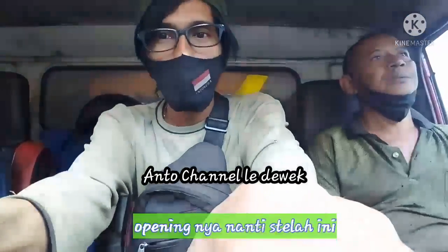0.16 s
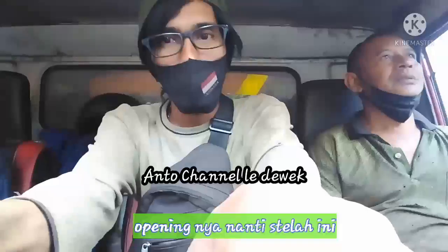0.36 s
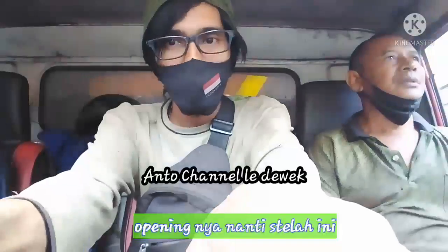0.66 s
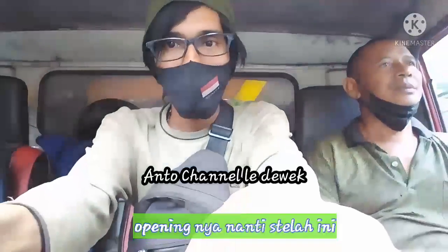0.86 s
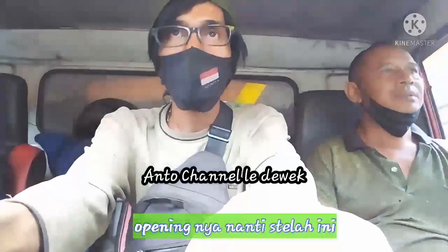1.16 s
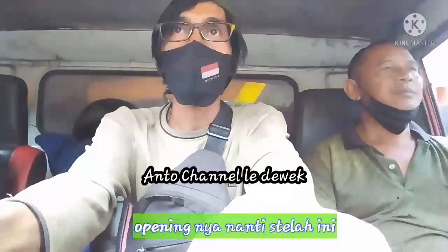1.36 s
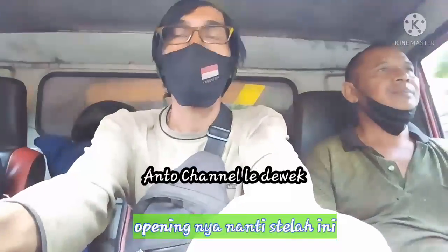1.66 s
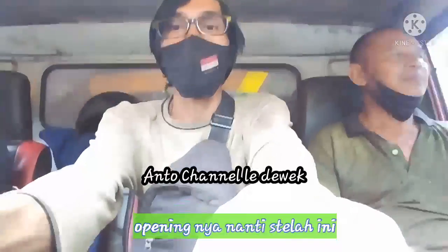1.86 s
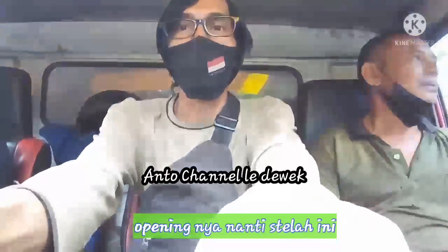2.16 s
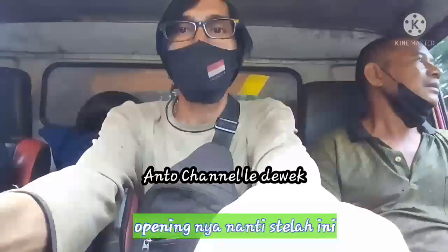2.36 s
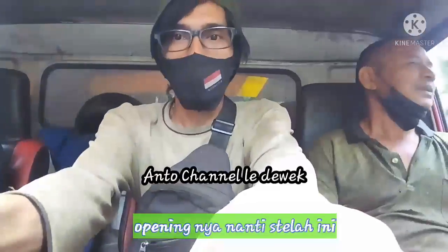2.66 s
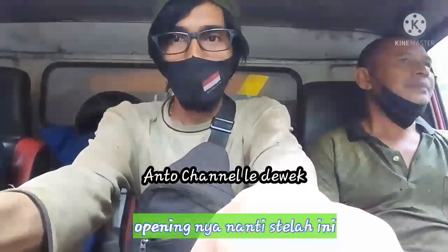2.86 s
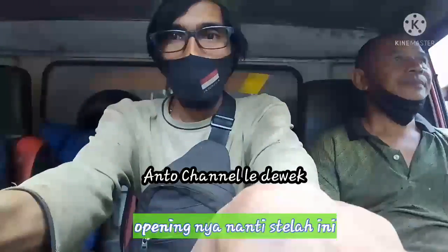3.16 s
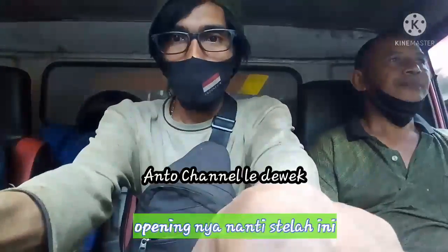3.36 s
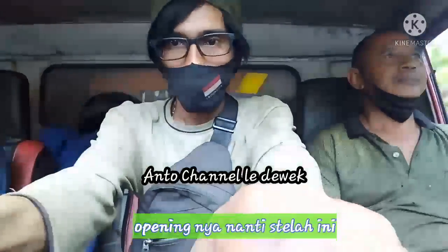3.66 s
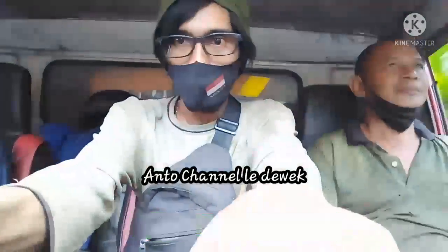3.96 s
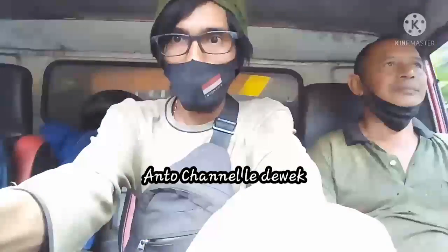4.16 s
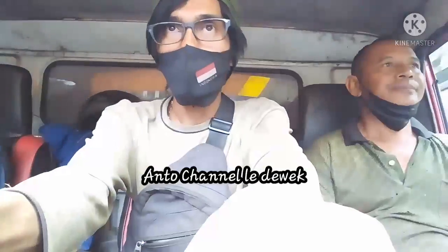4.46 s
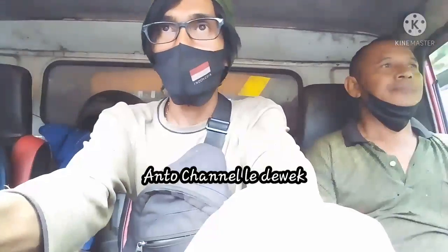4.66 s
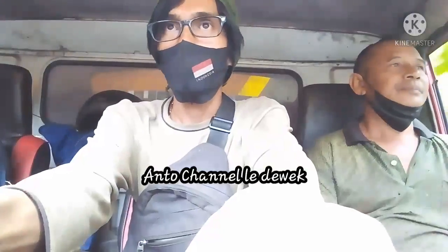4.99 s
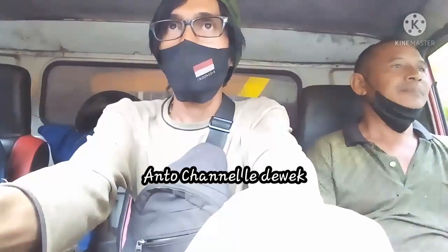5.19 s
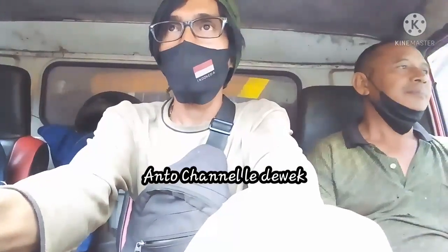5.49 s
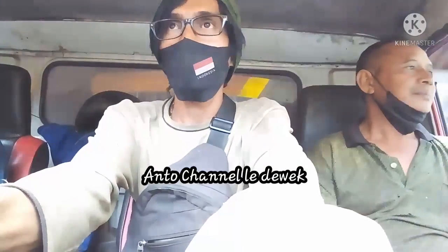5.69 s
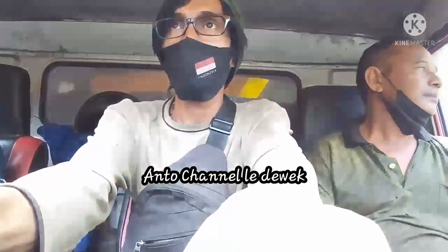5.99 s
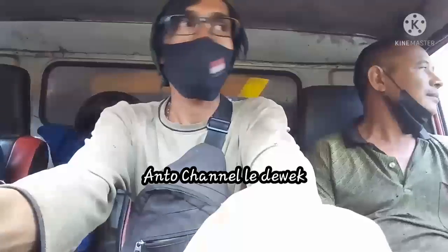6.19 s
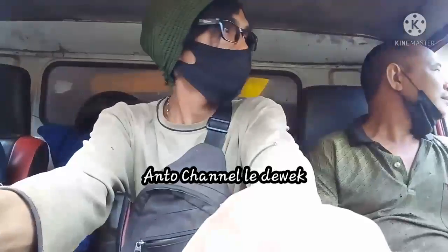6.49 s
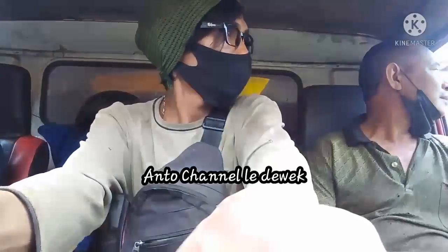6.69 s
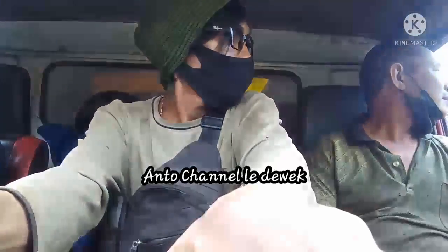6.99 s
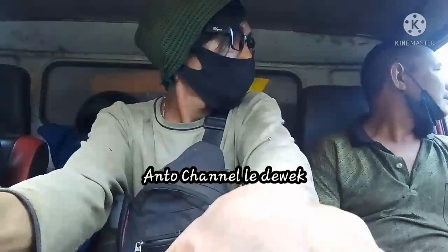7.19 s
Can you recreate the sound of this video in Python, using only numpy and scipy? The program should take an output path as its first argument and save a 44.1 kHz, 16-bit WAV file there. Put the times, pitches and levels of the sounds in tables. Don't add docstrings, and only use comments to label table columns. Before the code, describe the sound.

Inside a truck cab, a diesel engine drones low while wind pops thump the microphone, then a sudden jump to a louder, harder drone.

```python
import sys
import numpy as np
from scipy import signal
from scipy.fft import rfft, irfft, next_fast_len
from scipy.io import wavfile
from scipy.ndimage import uniform_filter1d, minimum_filter1d

SR = 44100
rng = np.random.default_rng(int(sys.argv[2]) if len(sys.argv) > 2 else 0)


def pcm_store(signal):
    levels = np.round(np.clip(np.atleast_2d(signal), -1, 1) * 32767)
    wavfile.write(sys.argv[1], SR, levels.astype(np.int16).T)


def magnitude_from_level(level_db):
    exponent = np.asarray(level_db, float) / 20
    return 10 ** exponent


N = 323546

# time in seconds, firing rate in Hz, drone lines above their usual share in dB.
FIRING = [(0, 52.3, 3.5), (.35, 51.91, 0), (.75, 50.82, 1.5), (1.15, 49.07, 1), (2.1, 48.6, 0),
          (2.9, 50.47, -7.5), (3.6, 51.63, -8.5), (4.3, 53.2, -7.5), (4.9, 54.25, -10), (5.1, 55.36, 1.5),
          (5.5, 55.2, 2), (5.9, 55.75, -0.5), (6.1, 56.5, 0), (6.3, 55.68, -1), (6.75, 55.84, 0.5),
          (6.95, 53.98, -1), (7.15, 52.75, -1), (7.34, 54.5, 2)]
# time in seconds, level in dB, load from 0 to 1.
LOAD = [(0, -24.5, 0.4), (.28, -24.5, 0.19), (1.1, -27.5, 0.16), (1.3, -33.5, 0.32), (1.73, -32.5, 0.26),
        (2.1, -31, 0.22), (2.61, -28.5, 0.19), (3.02, -32, 0.3), (3.35, -31.5, 0.37), (3.7, -36.5, 0.3),
        (4.2, -40, 0.22), (4.9, -34.5, 0.03), (5.01, -19.5, 0.52), (5.4, -26, 0.91), (5.9, -23.5, 0.79),
        (6.15, -21.5, 0.81), (6.72, -18.5, 0.76), (7.34, -19, 0.59)]
# multiple of the firing rate, level at full load in dB, loss at light load in dB.
DRONE_ORDERS = [(1.5, -20, 6), (6, -23.5, 5.5), (2.5, -16.5, 10), (2, -2.5, 1.5), (3, -9.5, 5.5),
                (3.5, -13, 7.5), (4, -13.5, -4), (5, -8, 11.5), (5.5, -19, 6)]
WHINE_ORDERS = [(4.5, -20.5, 6), (9, -16, 18), (10, -17.5, 14), (11, -19.5, 13), (14, -19, 19),
                (7, -24, 14), (8, -27, 14)]
# centre in seconds, depth in dB, half length in
# seconds.
HOLLOWS = [(0.43, 3, 0.12), (0.916, 8, 0.063), (1.263, 11, 0.066), (1.535, 9, 0.071), (1.912, 23, 0.053),
           (2.23, 12, 0.089), (2.969, 2.5, 0.052), (3.1, 1, 0.088), (3.467, 4.5, 0.056), (4.207, 11, 0.13),
           (4.4, 14, 0.11), (4.594, 21, 0.099), (4.756, 7, 0.069), (4.973, 11, .06), (5.69, 5, 0.089),
           (6.09, 3.5, 0.3), (6.76, 3, 0.15), (7.135, 3, 0.46), (7.34, 12, 0.02)]
# frequency in Hz, width in Hz, level at full load in dB, loss at light load in dB.
PANELS = [(499, 35, -8, 4), (540.3, 41, -8, 3), (610.5, 29, -11, 6.5), (772, 52, -9, 1.5),
          (1116, 59, -24, 10.5), (1605, 54, -27, 14), (1920, 90, -33, 2.5), (959, 11, -23, 4),
          (1333, 25, -23.5, 4), (1430, 61, -23, 13.5)]
# time in seconds, level in
# dB.
WINDOW = [(0, -56), (1.1, -56.5), (1.49, -59.5), (1.9, -57), (2.29, -54), (2.61, -51), (2.9, -54),
          (3.6, -56.5), (4.2, -61), (4.72, -60), (4.95, -65), (5.06, -32), (5.31, -45), (5.66, -39),
          (6.0, -44.5), (6.13, -35.5), (6.5, -41.5), (7.34, -45.5)]

# frequency in Hz, density in dB per Hz.
RUMBLE_COLOUR = [(25, -15.5), (60, -17), (95, -10), (130, -1), (200, -3.5), (280, -13), (350, -19.5),
                 (500, -26)]
LUMPS_COLOUR = [(18, -20.5), (42, -17), (66, 2), (85, -7.5), (120, -23)]
ROAR_COLOUR = [(200, -24.5), (330, -3.5), (440, -6), (520, -0.5), (610, -3.5), (690, -8.5), (780, -6),
               (910, -13), (1350, -17), (1700, -25), (2400, -37.5)]
ROAD_COLOUR = [(600, -15), (1000, 0), (1400, 2), (1700, -2), (2600, -7.5), (2850, -9.5), (3050, -15),
               (4000, -23), (5000, -40.5)]
TICKOVER_COLOUR = [(700, -13.5), (1100, -2.5), (1500, -7), (1720, -8.5), (1980, -5.5), (2650, -6.5),
                   (2850, -11), (3050, -20), (3600, -26.5), (3750, -21), (4100, -27.5), (4300, -38.5)]
AIR_COLOUR = [(2600, -10), (3400, 0), (3900, 2.5), (4400, -1.5), (5700, -1.5), (6300, -16), (7800, -9),
              (11000, -11), (15500, -17.5)]
BUFFET_COLOUR = [(40, -23.5), (90, 5.5), (200, -3), (350, -13), (600, -23.5)]
WASH_COLOUR = [(250, -16), (420, -4), (560, 1), (800, -3), (1300, -9.5), (1900, -22), (3000, -48.5)]
RUSH_COLOUR = [(1000, -2.5), (1500, 1), (2650, -6), (3900, -17.5), (5000, -33.5), (7000, -58.5)]
HISS_COLOUR = [(3000, -24), (4300, 1.5), (5500, -1.5), (7000, -6), (11000, -8.5), (12500, -18.5),
               (15500, -19)]
PIPE_COLOUR = [(140, -28), (170, -6), (200, 0.5), (230, -5), (270, -30)]

# time in seconds, peak in dB, width in ms, rebound in Hz, damping from 0 to 1.
PUSHES = [(1, -11, 0.24, 74.2, 0.3), (1.1444, 2, 0.22, 93.5, 0.5), (1.1613, -11, 0.27, 130, 0.6),
          (1.1649, -6, 0.35, 125, 0.5), (1.1662, -7, 0.23, 125, .6), (1.1676, -5, 0.2, 125, 0.5),
          (1.174, -5.5, 0.26, 110, 0), (1.181, -8, 0.38, 142, 0.05), (1.6478, -8.5, 0.64, 59.9, 0.05),
          (1.689, 1, 0.7, 89.7, 1), (1.7096, -6, 0.47, 75, 0), (1.7283, -2.5, 0.99, 59, 1),
          (1.7334, -19.5, 0.27, 136, 0.3), (1.7778, -9, 0.38, 123, 0.17), (2.018, -14.5, 0.37, 166.5, 0.13),
          (2.0655, -1, 0.31, 137, 0.21), (2.107, -8.5, 0.49, 144, 0.22), (2.127, -11, 0.4, 95, 1),
          (2.143, -19.5, 0.44, 100, 0.49), (2.3278, -4, 0.67, 60, 0.3), (2.348, -10, 0.94, 110, .3),
          (2.778, -14, 0.27, 59.2, 0.3), (3.1502, -10.5, 0.38, 59.6, 0.37), (3.5974, 4, .21, 119, 0.34),
          (3.6642, -15, 0.28, 90, 0.15), (2.3305, -16.5, .4, 140, 0.6), (5.0065, -1, 1.8, 60, .4),
          (5.0112, -9, .7, 70, .5)]
PULLS = [(1.156, -5, 0.57, 89, 0.7), (1.1687, -9.5, .3, 120, 0.7), (1.1699, -6.5, 0.35, 120, 0.5),
         (2.329, -16, .5, 130, 0.8), (2.332, -15, 0.64, 130, .5), (1.669, -4, 1.2, 59.7, 0.23),
         (1.8332, -2.5, .33, 101, 0.17), (2.2147, -2, 0.28, 98, 0.17), (2.5693, 3, .33, 94, 0.12),
         (2.987, 2, 0.25, 100, 0.22), (3.007, 9.5, 1.7, 132, 0.57), (3.036, -2, 0.5, 110, 0.2),
         (3.1032, 2.5, .28, 79.6, 0.7), (3.4704, -17, 1.1, 78, 0.35), (3.7365, -20.5, 0.27, 118, 0.6),
         (3.9492, -17, .23, 101.2, 0.1), (3.968, -13, 0.63, 114, 0.22), (4.005, -7.5, 0.31, 95, 0.3),
         (4.2133, -19, 0.22, 108, 0.09), (4.497, -27, 0.2, 134, 0.07), (4.9865, 3.5, 0.36, 114, 0.16)]
# crest in seconds, wash in dB, seconds to rise 20 dB, seconds to fall 20 dB,
# brightness in dB.
GUSTS = [(1.003, -38, 0.0032, 0.062, -8.5), (1.07, -37.5, 0.066, 0.014, -30.5),
         (1.167, -15.5, 0.018, 0.013, -29.5), (1.221, -32.5, 0.017, 0.05, -20),
         (1.247, -34, 0.091, 0.012, -26.5), (1.962, -31, 0.071, 0.044, -13.5),
         (2.016, -29.5, 0.012, 0.024, -35), (2.11, -32.5, 0.039, 0.05, -27.5),
         (2.224, -34, 0.0047, 0.033, -22), (2.329, -25.5, 0.015, 0.012, -21), (2.245, -49, .008, 0.13, -4),
         (2.41, -47, 0.12, 0.15, -7), (3.148, -39, 0.015, 0.048, -27.5), (3.289, -27.5, .14, 0.12, -13),
         (3.695, -28.5, 0.038, 0.033, -16.5), (4.036, -27, 0.018, 0.023, -17),
         (4.072, -35, 0.11, 0.0039, -13), (4.795, -53.5, 0.0116, 0.34, -7.5),
         (4.86, -43.5, 0.37, 0.092, -12), (5.011, -29.5, 0.0097, 0.71, -15),
         (5.074, -22.5, 0.055, 0.37, -10), (5.139, -22, 0.12, 0.1, -4), (5.189, -22, 0.24, 0.036, -6),
         (5.29, -40.5, 0.072, 0.013, -23)]
# start in seconds, level in dB, seconds to lose 20 dB.
BUFFETS = [(1.001, -16.5, 0.2), (1.158, -8.5, 0.12), (1.198, -17.5, 0.15), (1.94, -20, 0.07),
           (2.01, -22, -0.2), (2.085, -17.5, -0.17), (2.119, -7, 0), (2.227, -18, .04), (2.315, -17, 0),
           (2.39, -30.5, 3), (2.581, -21, 0.2), (3.11, -13, 0.05), (3.139, -16.5, 0.07), (3.189, -27, -0.5),
           (3.26, -23.5, 0.5), (3.41, -24, 0.2), (3.667, -20.5, -0.1), (4.01, -16, 0.08),
           (4.055, -25, -0.06), (4.289, -31, 0), (4.83, -29, 8), (4.926, -23, 0), (4.995, -15, 0.1),
           (5.07, -20, 0), (5.181, -21.5, -0.5), (6.04, -25, 1), (7.219, -15.5, -2)]
# start in seconds,
# end in seconds, level in dB, low edge in Hz, high edge in Hz. None lasts beyond 0.36 s
BRUSHES = [(1.03, 1.095, -79, 4300, 5800), (1.153, 1.188, -22, 290, 1200),
           (1.154, 1.183, -34.5, 1000, 2000), (1.153, 1.18, -62.5, 3100, 5400),
           (1.21, 1.252, -31, 370, 1130), (1.212, 1.25, -44.5, 1010, 2000), (1.215, 1.25, -75, 4600, 5400),
           (4.008, 4.052, -39, 260, 1130), (4.048, 4.082, -40, 320, 920), (4.012, 4.076, -63, 3000, 5900),
           (4.76, 4.5, -73, 4600, 5700), (5.43, 5.66, -57.5, 950, 4300), (6.06, 6.26, -37, 670, 870),
           (6.62, 6.82, -36, 560, 1640), (5.3, 6.44, -78, 7000, 11500), (2.22, 2.58, -87, 7000, 11500),
           (2.24, 2.3, -80, 4800, 6000), (2.237, 2.243, -64, 2500, 5500), (2.222, 2.238, -42.5, 400, 1740),
           (1.215, 1.25, -31, 250, 480), (5.1, 5.9, -74.5, 6200, 11000), (2.322, 2.342, -37, 210, 770),
           (5.2, 5.235, -40, 600, 2200), (5.27, 5.33, -46, 780, 2200), (2.5683, 2.5703, -48, 1800, 4000),
           (3.1022, 3.1042, -57, 2200, 5500), (3.5965, 3.5985, -53, 3000, 5300),
           (2.0645, 2.0665, -50, 2000, 3600), (3.668, 3.69, -46, 400, 1500), (1.163, 1.17, -22, 500, 1300)]
# crest in seconds, level in dB, seconds to rise 20 dB, seconds to fall 20 dB.
SWELLS = [(2.12, -26.5, .03, .06), (2.335, -25.5, .02, .06), (3.16, -25, 0.044, .08), (3.29, -27, .12, .12),
          (6.121, -26, .15, 0.16), (6.6, -28.5, 0.25, 0.16), (6.85, -26.5, 0.18, 0.14),
          (7.1, -26, 0.23, 0.18), (7.28, -19, 0.13, 0.17)]
# centre in seconds, spread in seconds, start in Hz, end in Hz, level in dB, fourth partial in dB.
SQUEAK = (6.172, .015, 1630, 1590, -31.5, -40)
# time in seconds, level in dB, low edge in Hz, high edge in Hz, fall in seconds.
TICKS = [
    (.999, -48, 1500, 5600, .004),
    (1.1433, -30, 3600, 5700, .0012),
    (4.062, -56, 2500, 6000, .003),
    (1.989, -52, 2500, 5300, .002),
    (4.058, -53, 9000, 14000, .004),
    (3.6635, -44, 600, 2800, .0015),
    (4.986, -36, 1500, 5000, .0012),
    (5.18, -35, 3400, 10000, .003),
    (5.185, -56, 6000, 15000, .012),
]
# time in seconds, level in dB.
MIC_HISS = [(0, -80), (1.15, -80), (1.3, -92), (2.15, -92), (2.4, -83), (3.0, -83), (3.4, -94), (7.34, -94)]


def rms_one(x):
    return x / np.sqrt(np.mean(x ** 2) + 1e-20)


def in_time(rows):
    time_s, *columns = np.transpose(rows)
    return [np.interp(np.arange(N) / SR, time_s, column) for column in columns]


def drift(rate_hz):
    r = np.exp(-80 * np.pi * rate_hz / SR)
    slow = signal.lfilter([1], [1, -2 * r, r * r], rng.standard_normal(N // 40 + 2002))[2000:]
    return np.interp(np.arange(N) / 40, np.arange(len(slow)), rms_one(slow))


def coloured(spectrum):
    hz, level_db = np.transpose(spectrum)
    size = next_fast_len(N)
    grid_hz = np.fft.rfftfreq(size, 1 / SR) + 1
    shape = magnitude_from_level(np.interp(np.log(grid_hz), np.log(hz), level_db, -90, -90))
    return rms_one(irfft(rfft(rng.standard_normal(size)) * shape, size)[:N])


def crest(peak_s, rise_s, fall_s):
    t = np.arange(0, N, 20) / SR - peak_s
    slope = np.minimum(t / max(rise_s, .002), -t / max(fall_s, .002))
    return magnitude_from_level(np.maximum(20 * slope, -100))


def lines(orders, turn, ease, wander_db, slip_rad, spread_rad=0):
    out = 0
    for order, level_db, lost_db in orders:
        height = np.sqrt(2) * magnitude_from_level(level_db - lost_db * ease + wander_db * drift(3.3))
        lag = spread_rad * order ** 2
        out = out + height * np.cos(order * turn - lag + slip_rad * drift(4.5))
    return out


def engine():
    firing_hz, clear_db = in_time(FIRING)
    turn = 2 * np.pi * np.cumsum(firing_hz) / SR - 2.5
    engine_db, load = in_time(LOAD)
    window_db, = in_time(WINDOW)
    roar_db = engine_db - 21 + 17.5 * load
    ease = np.clip((-28 - roar_db) / 12, 0, 1)
    throb = np.cos(turn + 0.43)

    hollow_db = 0
    for s, depth_db, half_s in HOLLOWS:
        hollow_db = hollow_db + in_time([(s - half_s, 0), (s, depth_db), (s + half_s, 0)])[0]
    boom_db = engine_db + 10 - 4.5 * load - hollow_db
    boom = magnitude_from_level(boom_db) * lines([(1, 0.012, 0.0061)], turn, ease, wander_db=1.0, slip_rad=0.071)

    rumble = magnitude_from_level(-3 - 2 * ease + 1.2 * drift(11)) * coloured(RUMBLE_COLOUR)
    lumps = magnitude_from_level(-15.5 + 15.7 * ease + 0.29 * drift(5.2)) * coloured(LUMPS_COLOUR)
    orders = lines(DRONE_ORDERS, turn + 1.57, ease, wander_db=1.7 - .5 * ease,
                   slip_rad=.42 - .2 * ease, spread_rad=.43)
    drone = magnitude_from_level(engine_db) * (magnitude_from_level(clear_db) * orders + rumble + lumps)

    roar = magnitude_from_level(-2 + 0.5 * drift(25) + 0.77 * throb) * coloured(ROAR_COLOUR)
    roar = magnitude_from_level(roar_db) * (roar + panels(turn, ease))

    calm = np.clip((-49.5 - window_db) / 6, 0, .9)
    clatter_gain = magnitude_from_level(window_db + drift(15) + 0.36 * throb)
    road = np.sqrt(1 - calm) * coloured(ROAD_COLOUR)
    tickover = np.sqrt(calm) * magnitude_from_level(-1.64) * coloured(TICKOVER_COLOUR)
    clatter = clatter_gain * (road + tickover)

    air_db = -78.5 + 0.6 * (window_db + 55.5)
    air = magnitude_from_level(air_db + 0.59 * drift(4)) * coloured(AIR_COLOUR)
    return boom + drone + roar + clatter + air


def panels(turn, ease):
    fired = np.flatnonzero(np.diff(turn // (2 * np.pi)))
    knocks, out = np.full(N, 1e-18), 0
    chance = rng.standard_normal(N // 400)[:len(fired)]
    knocks[fired] = magnitude_from_level(2.0 * (np.arange(len(fired)) % 2) + 2.2 * chance)
    knocks = knocks + .024 * rng.standard_normal(N)
    for hz, width_hz, level_db, lost_db in PANELS:
        r = np.exp(-np.pi * width_hz / SR)
        poles = [1, -2 * r * np.cos(2 * np.pi * hz / SR), r * r]
        rung = signal.lfilter([1, 0, -1], poles, knocks)
        rung = signal.lfilter([1, 0, -1], poles, rung)
        out = out + magnitude_from_level(level_db - lost_db * ease + 0.47 * drift(3.7)) * rms_one(rung)
    return out


def whine():
    firing_hz, _ = in_time(FIRING)
    engine_db, load = in_time(LOAD)
    turn = 2 * np.pi * np.cumsum(firing_hz) / SR
    ease = np.clip(1.6 - 2.2 * load, 0, 1)
    return magnitude_from_level(engine_db) * lines(WHINE_ORDERS, turn, ease, wander_db=2.2, slip_rad=.6)


def pops():
    lead = 900
    out, t = np.zeros(N), np.arange(-lead, 4000) / SR
    die_out = np.clip((t[-1] - t) * 25, 0, 1)
    for side, rows in ((0.94, PUSHES), (-0.95, PULLS)):
        for s, peak_db, width_ms, rebound_hz, damping in rows:
            bump = side * magnitude_from_level(peak_db) / np.cosh(t * 1000 / width_ms)
            w = 2 * np.pi * rebound_hz
            vent = signal.bilinear([1, 0, 0], [1, 2 * np.clip(damping, .05, 1) * w, w * w], SR)
            at = round(s * SR) - lead
            out[at:at + len(t)] += signal.lfilter(*vent, bump) * die_out
    return signal.sosfiltfilt(signal.butter(3, 75, "high", fs=SR, output="sos"), out)


def gusts():
    buffet = wash = rush = hiss = 0
    for s, wash_db, rise_s, fall_s, bright_db in GUSTS:
        gust = crest(s, rise_s, fall_s)
        wash = wash + gust * magnitude_from_level(wash_db)
        rush = rush + gust * magnitude_from_level(wash_db + bright_db)
        hiss = hiss + gust * magnitude_from_level(wash_db - 26 + 0.6 * bright_db)
    for s, level_db, fall_s in BUFFETS:
        limit = crest(s + .12, np.inf, 0.02)
        buffet = buffet + magnitude_from_level(level_db) * crest(s, 0.02, fall_s) * limit
    gains = np.repeat([buffet, wash, rush, hiss], 20, axis=1)[:, :N]
    buffet, wash, rush, hiss = uniform_filter1d(gains, size=300)
    eddies = magnitude_from_level(drift(95))
    low = magnitude_from_level(-3 + 2.5 * drift(28)) * buffet * coloured(BUFFET_COLOUR)
    middle = magnitude_from_level(-3.5) * wash * coloured(WASH_COLOUR) + magnitude_from_level(-3) * rush * coloured(RUSH_COLOUR)
    high = magnitude_from_level(-8.5) * hiss * coloured(HISS_COLOUR)
    return low + eddies * (middle + high)


def brushes():
    out, t = np.zeros(N), np.arange(16000) / SR
    for start_s, end_s, level_db, low_hz, high_hz in BRUSHES:
        edge_s = 0.19 * (end_s - start_s)
        gate = np.clip(np.minimum(t, end_s - start_s - t) / edge_s, 0, 1)
        band = signal.butter(4, [low_hz, high_hz], "band", fs=SR, output="sos")
        grains = rms_one(signal.sosfilt(band, rng.standard_normal(len(t))))
        out[round(start_s * SR):][:len(t)] += magnitude_from_level(level_db) * gate * grains
    return out


def exhaust():
    swell = sum(magnitude_from_level(level_db) * crest(s, rise_s, fall_s) for s, level_db, rise_s, fall_s in SWELLS)
    return np.repeat(swell, 20)[:N] * coloured(PIPE_COLOUR)


def trim():
    t = np.arange(N) / SR
    centre_s, spread_s, start_hz, end_hz, level_db, fourth_db = SQUEAK
    place = (t - centre_s) / spread_s
    turn = 2 * np.pi * np.cumsum(np.interp(place, [-2, 2], [start_hz, end_hz])) / SR
    tone = np.sin(turn) + magnitude_from_level(fourth_db) * np.sin(4 * turn)
    out = magnitude_from_level(level_db) * np.exp(-.5 * place ** 2) * tone
    for s, tick_db, low_hz, high_hz, fall_s in TICKS:
        burst = rng.standard_normal(2000) * np.exp(-t[:2000] / fall_s)
        band = signal.butter(3, [low_hz, high_hz], "band", fs=SR, output="sos")
        out[round(s * SR):][:2000] += magnitude_from_level(tick_db) * signal.sosfilt(band, burst)
    return out


def scene():
    thumps = pops()
    reach = -minimum_filter1d(-np.abs(thumps), size=500)
    dip = magnitude_from_level(-9 * uniform_filter1d(reach, size=150))
    cab = engine() + whine() + gusts() + brushes() + exhaust() + trim()
    hiss = magnitude_from_level(in_time(MIC_HISS)[0]) * rng.standard_normal(N)
    return (cab * dip + thumps + hiss)[None]


def low_pass(x):
    return signal.sosfilt(signal.butter(12, 15600, fs=SR, output="sos"), x)


def record(dry):
    room_left = np.minimum(1, .99 / (np.abs(dry) + 1e-9))
    gain = uniform_filter1d(minimum_filter1d(room_left, size=81), size=41)
    return low_pass(dry * gain)


dry = scene()
out = record(dry)
pcm_store(out)
```